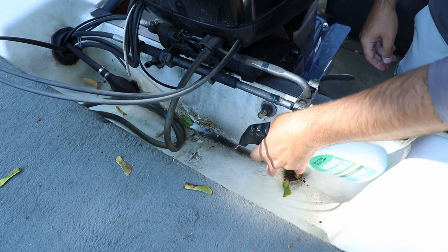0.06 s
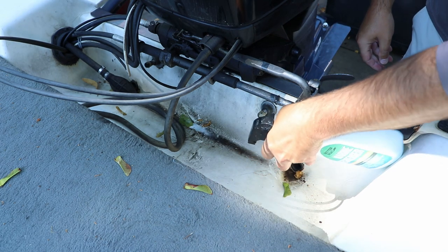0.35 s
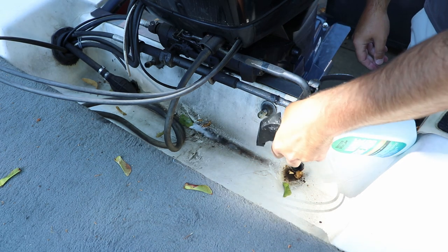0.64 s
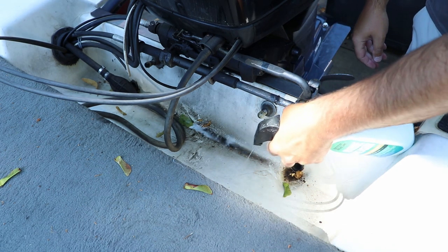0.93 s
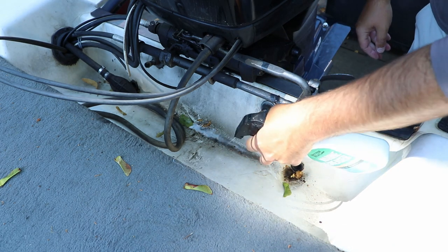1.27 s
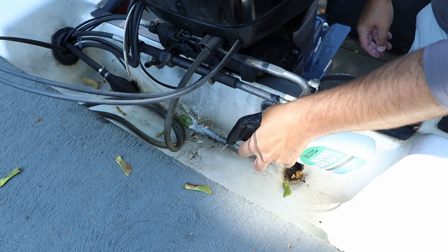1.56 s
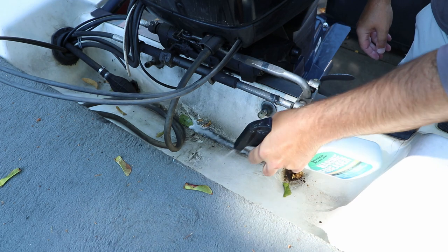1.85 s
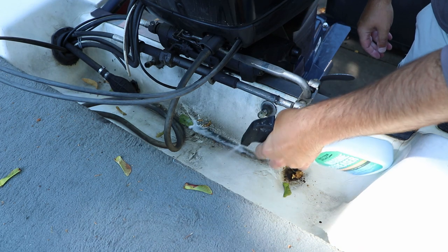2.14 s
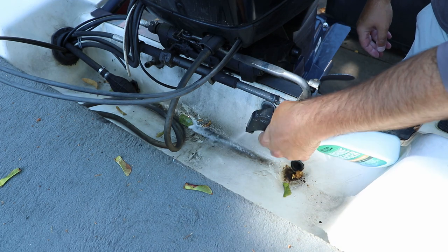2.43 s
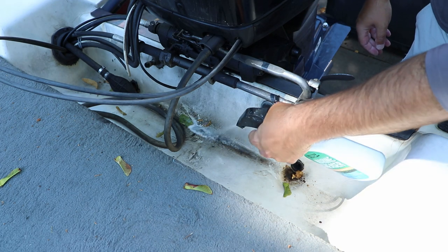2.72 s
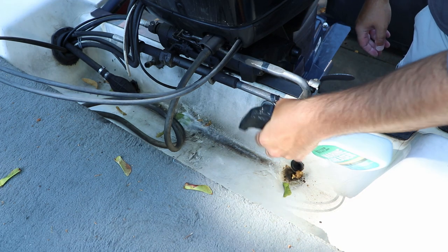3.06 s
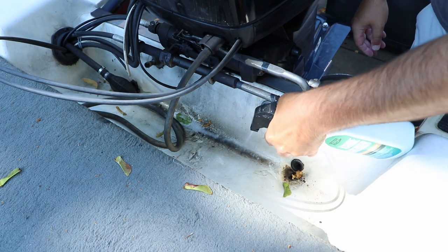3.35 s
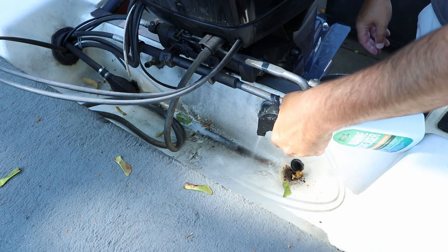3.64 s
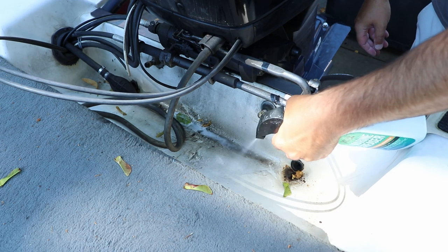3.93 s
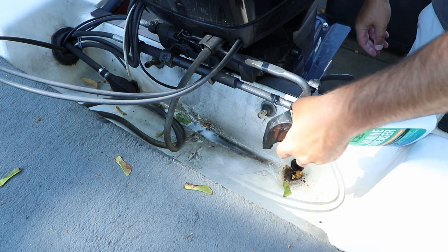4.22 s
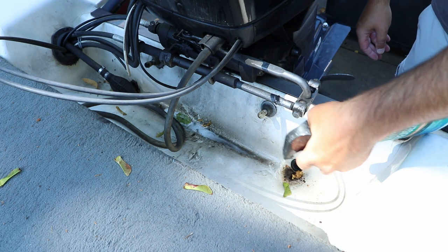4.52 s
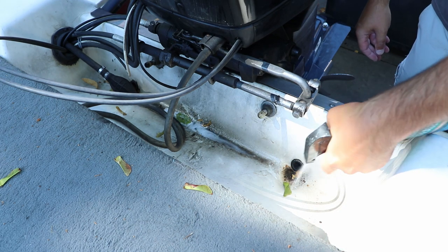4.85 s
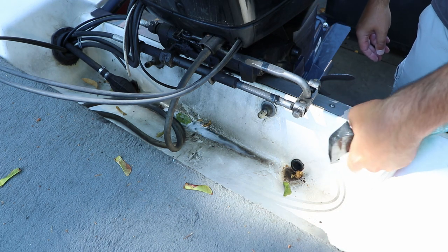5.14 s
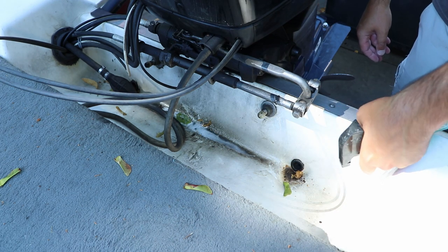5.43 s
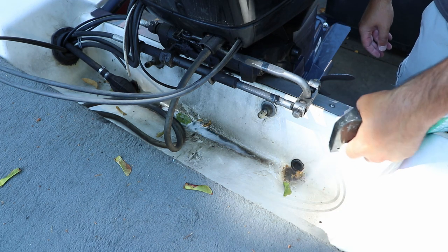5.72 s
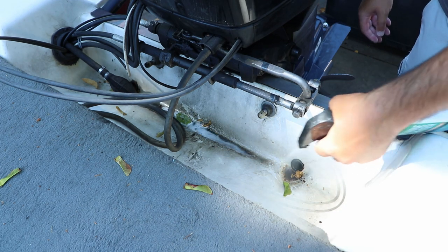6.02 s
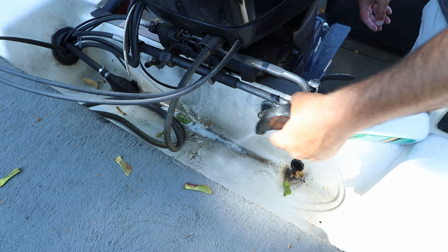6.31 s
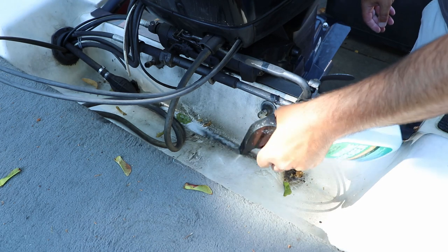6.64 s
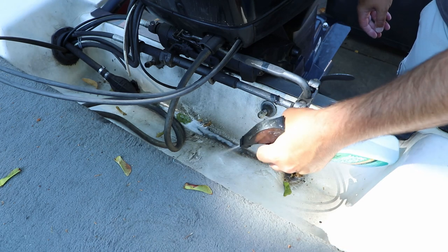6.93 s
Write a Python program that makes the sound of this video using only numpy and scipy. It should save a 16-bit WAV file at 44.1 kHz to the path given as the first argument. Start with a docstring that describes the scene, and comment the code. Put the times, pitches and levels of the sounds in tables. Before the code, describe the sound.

Outdoors, a trigger spray bottle is pumped about three times a second against a boat's hull. Each squeeze gives a short sputter and a wet hiss, followed by a plastic click and a small gulp. The spraying breaks off briefly after the middle, then resumes. Wind buffets the microphone with a low rumble, strongest early on. A few hollow knocks sound over a faint, distant rush of traffic and leaves.

```python
"""Wind buffets the microphone as a trigger spray bottle is pumped, about three times a second,
over a boat's engine well. Each squeeze spits through a fluttering valve, then opens into a hissing
mist that wets the hull; the plastic trigger clicks as it springs back and the pump gulps.
Something hollow knocks now and then, and a far rush of traffic and leaves lies underneath."""
import sys
import numpy as np
from scipy import signal
from scipy.fft import rfft, irfft, next_fast_len
from scipy.io import wavfile
from scipy.ndimage import uniform_filter1d, map_coordinates

SR = 44100
rng = np.random.default_rng(int(sys.argv[2]) if len(sys.argv) > 2 else 0)


def persist_wave(psi):
    """Save psi, clipped to +-1, as 16-bit WAV."""
    counts = np.round(np.clip(psi, -1, 1) * 32767).astype(np.int16)
    wavfile.write(sys.argv[1], SR, np.atleast_2d(counts).T)


N = 316440


def amp(db):
    """Decibels to gain."""
    return 10 ** (np.asarray(db) / 20)


def unit(x):
    """Scale to rms 1."""
    return x / np.sqrt(np.mean(x ** 2) + 1e-20)


def clock():
    """Sample times in seconds."""
    return np.arange(N) / SR


def wobble(rate_hz):
    """Smooth random curve, rate_hz knots a second."""
    step = max(int(SR / rate_hz / 6), 1)
    at = np.arange(0, N + step, step)
    knots = rng.standard_normal(int(N * rate_hz / SR) + 4)
    return np.interp(np.arange(N), at, map_coordinates(knots, [at * rate_hz / SR]))


def filtered(x, response):
    """Apply a gain given as a function of frequency."""
    size = next_fast_len(N + 8192)
    return irfft(rfft(x, size) * response(np.fft.rfftfreq(size, 1 / SR)), size)[:N]


def coloured(x, spectrum):
    """Shape x by (frequency [Hz], level [dB]) points; rms 1."""
    points_hz, db = np.transpose(spectrum)
    return unit(filtered(x, lambda hz: amp(np.interp(np.log(hz + 1), np.log(points_hz), db))))


def grains(depth_db, rate_hz):
    """White noise broken into tiny uneven grains."""
    return rng.standard_normal(N) * amp(depth_db * wobble(rate_hz))


def patchy(x, depth_db):
    """Slow random spectral peaks and dips, as the nozzle's aim shifts."""
    spectra = signal.stft(x, nperseg=512)[2]
    field = uniform_filter1d(rng.standard_normal(spectra.shape), size=5, axis=0)
    field = uniform_filter1d(field, size=14, axis=1)
    return signal.istft(spectra * amp(depth_db * unit(field)), nperseg=512)[1][:N]


def bursts(times_s, levels_db, rise_s, t60_s, slowness=1):
    """Envelope of short bursts, each randomly stretched in time."""
    out, t = np.zeros(N + SR), np.arange(SR // 10) / SR
    stretches = slowness * np.exp(rng.normal(0, 0.15, len(times_s)))
    for at_s, db, stretch in zip(times_s, levels_db, stretches):
        attack = 1 - np.exp(-(t / (rise_s * stretch)) ** 2)
        shape = attack * amp(-60 * t / (t60_s * stretch))
        start = max(round((at_s - rise_s * (stretch - 1)) * SR), 0)
        out[start:][:len(t)] += amp(db) * shape / shape.max()
    return out[:N]


def swell(crest_s, length_s, fullness, rise_share=0.43):
    """Rise and fall: 1 at the crest, 0.1 at both ends of the length."""
    t = clock() - crest_s
    distance = np.abs(t) / (length_s * np.where(t < 0, rise_share, 1 - rise_share))
    out, near = np.zeros(N), distance < 2
    out[near] = 10 ** -(distance[near] ** fullness)
    return out


# Background spectrum (frequency [Hz], level [dB])
OUTDOOR_SPECTRUM = [(60, -12), (200, -13), (350, -12), (520, -9), (750, -8), (980, -4.5), (1180, -7.5),
                    (1600, -17.5), (2700, -15.5), (4200, -21), (6000, -28.5), (8000, -34), (15800, -41)]


def outdoors():
    """Far, even rush of traffic and leaves."""
    level_db = -46 + 0.097 * wobble(2.72) + 1.5 * wobble(14)
    return amp(level_db) * coloured(rng.standard_normal(N), OUTDOOR_SPECTRUM)


def eddies(spectrum, evenness):
    """Low turbulence; evenness (0 to 1) flattens slow swells, leaving the quick lumps."""
    noise = coloured(rng.standard_normal(N), spectrum)
    power = np.abs(uniform_filter1d(noise ** 2, size=SR // 12)) + 1e-6
    return unit(noise / power ** (evenness / 2))


# Breeze strength (time [s], level [dB])
BREEZE_CURVE = [(0, -30.5), (.25, -23), (1.3, -23.5), (1.72, -18.5), (2.0, -26), (2.6, -26.5),
                (2.85, -24.5), (3.15, -27.5), (3.3, -33), (3.72, -38.5), (3.9, -43), (4.88, -49),
                (5.08, -27.5), (5.3, -23.5), (5.62, -31.5), (5.75, -41.5), (6.5, -50.5), (7.18, -47)]
# Gusts (crest [s], length [s], rumble [dB], flutter [dB])
WIND_GUSTS = [(0.045, 0.18, -20, -19), (0.412, 0.1, -25, -13), (0.488, 0.064, -11, -22.5),
              (0.765, 0.14, -19, -22.5), (1.11, 0.18, -22.5, -25.5), (1.57, 0.082, -20.5, -29),
              (1.803, .22, -20, -10.5), (2.204, 0.068, -21, -25.5), (2.374, 0.11, -21, -25),
              (3.496, .16, -29.5, -39), (4.983, 0.051, -36, -40), (5.142, 0.05, -27, -35),
              (5.333, 0.08, -25, -26), (5.393, 0.13, -17.5, -54), (6.1, 0.44, -39, -46),
              (6.692, 0.17, -27.5, -37), (6.816, 0.1, -33, -48), (7.092, 0.13, -35, -36)]
# Turbulence spectra (frequency [Hz], level [dB])
RUMBLE_SPECTRUM = [(6, -39), (25, -7), (45, 3), (85, 4), (115, -3), (170, -29), (300, -57), (900, -130)]
FLUTTER_SPECTRUM = [(60, -31), (100, 0.5), (130, 3.5), (190, -7.5), (280, -20.5), (400, -37.5), (600, -59),
                    (1500, -71), (4000, -130)]
TEARING_SPECTRUM = [(100, -26), (220, 4.5), (310, -3.5), (440, -12.5), (700, -34), (1500, -57),
                    (5000, -120)]
DRAUGHT_SPECTRUM = [(8, -26), (25, 1), (45, 4), (70, -26), (130, -28), (400, -56), (1500, -120)]


def wind():
    """Gusts buffet the microphone over a steady draught; the strongest tear into higher eddies."""
    moderate_breeze_db, strong_flutter_db = -24, -12
    breeze_db = np.interp(clock(), *np.transpose(BREEZE_CURVE))
    rumble = amp(breeze_db + 1.3 * wobble(14))
    flutter = amp(-29 + 1.61 * (breeze_db - moderate_breeze_db) + 2.3 * wobble(20))
    for crest_s, length_s, rumble_db, flutter_db in WIND_GUSTS:
        gust = swell(crest_s, length_s, fullness=1.75)
        rumble += amp(rumble_db) * gust
        flutter += amp(flutter_db) * gust
    tearing = amp(-24.5 + 3.5 * wobble(45)) * (flutter / amp(strong_flutter_db)) ** 1.3
    return (rumble * eddies(RUMBLE_SPECTRUM, evenness=1.0)
            + flutter * eddies(FLUTTER_SPECTRUM, evenness=0.5)
            + tearing * eddies(TEARING_SPECTRUM, evenness=0.53)
            + amp(-43) * eddies(DRAUGHT_SPECTRUM, evenness=0.14))


# Soft contacts (time [s], level [dB], pitch [Hz])
DULL_BUMPS = [(0.732, -17, 340), (0.736, -28, 620), (0.931, -28.5, 730)]


def bumps():
    """Soft contacts give a few dull cycles."""
    out, jitter_rad = np.zeros(N), 1.9 * wobble(220)
    for at_s, db, hz in DULL_BUMPS:
        tone = np.sin(2 * np.pi * hz * clock() + jitter_rad)
        out += bursts([at_s], [db], rise_s=0.003, t60_s=0.033) * tone
    return out


# Knocks on the hollow body (time [s], level [dB])
HOLLOW_KNOCKS = [(1.995, -21.5), (2.156, -26.5), (3.198, -20.5), (6.923, -23.5), (7.167, -23.5)]
# Its modes (frequency [Hz], level [dB], t60 [s])
HOLLOW_MODES = [(332, 1, 0.02), (393, 2, 0.12), (823, -2, 0.04), (898, -4, 0.06), (980, -0.5, 0.056),
                (1294, -6.5, 0.036), (1860, -10, 0.019)]
# Contacts within one knock (delay [s], level [dB])
KNOCK_CONTACTS = [(0, 0), (.003, -9.5), (0.03, -15.5)]


def knocks():
    """A hollow body is knocked, rebounds lightly and rings in slightly smeared modes."""
    out, t = np.zeros(N + SR), np.arange(SR // 4) / SR
    hz, mode_db, t60_s = np.transpose(HOLLOW_MODES)[:, :, None]
    attack = 1 - np.exp(-t / 0.0012)
    for at_s, db in HOLLOW_KNOCKS:
        for delay_s, contact_db in KNOCK_CONTACTS:
            walk = np.cumsum(rng.normal(0, 0.0091, (len(hz), len(t))), axis=1)
            smear_cycles = walk * np.sqrt(hz / hz.max())
            decay = amp(mode_db + rng.normal(0, 1, hz.shape) - 60 * t / t60_s)
            modes = decay * np.sin(2 * np.pi * (hz * t + smear_cycles + rng.random(hz.shape)))
            out[round((at_s + delay_s) * SR):][:len(t)] += amp(db + contact_db) * modes.sum(0) * attack
    return out[:N]


# Knock thud spectrum (frequency [Hz], level [dB])
THUD_SPECTRUM = [(60, -17), (160, 3), (260, 4), (500, -15), (1100, -12), (1600, -20), (4000, -23),
                 (9000, -60)]


def thuds():
    """Dull, rough thud under the modes of each knock."""
    times_s, levels_db = np.transpose(HOLLOW_KNOCKS)
    envelope = amp(-9) * bursts(times_s, levels_db, rise_s=0.0019, t60_s=0.14)
    return envelope * coloured(grains(depth_db=3, rate_hz=350), THUD_SPECTRUM)


def tick(at_s=5.4995, level_db=-28, pitch_hz=14800):
    """One thin, very high tick."""
    tone = np.sin(2 * np.pi * pitch_hz * clock() + 1.3 * wobble(2200))
    return bursts([at_s], [level_db], rise_s=0.00055, t60_s=0.0062) * tone


# Air drawn in with the liquid (crest [s], length [s], level [dB])
PUMP_GARGLES = [(1.18, 0.15, -42.5), (2.28, 0.28, -41), (4.95, 0.053, -38), (5.25, 0.18, -36.5),
                (6.088, 0.21, -45)]
# Bubble spectrum (frequency [Hz], level [dB])
GARGLE_SPECTRUM = [(150, -17), (400, -13), (620, 6), (830, -9), (1030, 7.5), (1400, -4.5), (3000, -4.5),
                   (10000, -65)]


def gargle():
    """Air bubbles churn through the pump chamber."""
    churn = sum(amp(db) * swell(crest_s, length_s, fullness=1.5)
                for crest_s, length_s, db in PUMP_GARGLES)
    return churn * coloured(grains(depth_db=2, rate_hz=300), GARGLE_SPECTRUM)


# Trigger releases (first gulp [s], gulps [count], gulp [dB], click [dB])
TRIGGER_RELEASES = [(.129, 2, -40.5, -48.5), (0.482, 2, -40.5, -49), (0.787, 2, -42.5, -48),
                    (1.075, 2, -40.5, -46.5), (1.348, 2, -39.5, -45.5), (1.608, 2, -39, -45.5),
                    (1.893, 2, -41.5, -45), (2.169, 2, -38, -46), (2.443, 2, -40.5, -53.5),
                    (2.721, 2, -41, -46.5), (2.979, 1, -39.5, -46), (3.531, 1, -43, -45),
                    (3.856, 1, -40, -47.5), (4.19, 1, -43, -46.5), (4.913, 2, -41.5, -50.5),
                    (5.181, 2, -37.5, -50.5), (5.395, 1, -41.5, -49.5), (5.694, 1, -41.5, -47),
                    (6.265, 1, -39.5, -48), (6.55, 1, -42.5, -49), (6.854, 1, -42, -43.5),
                    (7.157, 1, -45, -46)]
# Lever snap and housing spectra (frequency [Hz], level [dB])
SNAP_SPECTRUM = [(2000, -2.5), (4500, 4.5), (6400, 2.5), (7200, 0), (8000, -1), (11000, -8.5), (15800, -22)]
HOUSING_SPECTRUM = [(400, -22), (900, -8.5), (1500, -7), (2000, 0.5), (2500, 4.5), (3100, -1), (4200, -7),
                    (6500, -40), (12000, -43)]


def trigger(click_lead_s=0.0463, stop_lead_s=0.011, stop_hz=2640):
    """Ahead of the gulp, the freed lever snaps against its plastic housing, then taps its stop."""
    gulp_s, _, _, click_db = np.transpose(TRIGGER_RELEASES)
    click_s = gulp_s - click_lead_s
    snap = bursts(click_s, click_db, rise_s=0.0017, t60_s=0.1)
    snap *= coloured(grains(depth_db=1, rate_hz=710), SNAP_SPECTRUM)
    housing = bursts(click_s, click_db + 3.5, rise_s=0.0028, t60_s=0.097)
    housing *= coloured(patchy(grains(depth_db=2, rate_hz=700), depth_db=4.5), HOUSING_SPECTRUM)
    stop = bursts(gulp_s - stop_lead_s, click_db + 3.5, rise_s=0.0016, t60_s=0.072)
    stop *= unit(wobble(900) * np.sin(2 * np.pi * stop_hz * clock()))
    return snap + housing + stop


def gulps(gap_s=0.017, second_boost_db=7, body_offset_db=-2, first_slowness=1.27):
    """Rows for spits(): each release draws a slow gulp, often followed by a sharper one."""
    return [(at_s + k * gap_s, db + k * second_boost_db, db + body_offset_db, 1 if k else first_slowness)
            for at_s, count, db, _ in TRIGGER_RELEASES for k in range(round(count))]


# Valve flutter as a squeeze begins or ends (time [s], spits [count], gap [s], fizz [dB], body [dB])
VALVE_SPUTTERS = [(0.024, 1, .018, -37, -28.5), (.533, 4, .0208, -35.5, -35.5), (.826, 3, .02, -36, -36.5),
                  (1.113, 4, .0158, -35, -33.5), (1.388, 3, .0183, -36, -31), (1.669, 4, .012, -39, -36.5),
                  (1.923, 2, .012, -40, -33), (2.203, 6, .0178, -33.5, -30.5), (2.316, 1, .015, -39, -31.5),
                  (2.472, 2, .01, -37.5, -34), (2.759, 3, .012, -35.5, -33.5), (3.0, 2, 0.021, -39, -38),
                  (3.071, 1, .015, -31, -28), (3.291, 3, .015, -38, -37.5), (3.604, 2, .007, -40.5, -39),
                  (3.916, 2, .007, -43, -45), (4.548, 1, .015, -45, -39), (4.94, 1, .015, -44, -38),
                  (5.213, 6, .0148, -37, -41), (5.46, 2, .01, -39.5, -39.5), (5.724, 2, .011, -40, -38),
                  (5.852, 2, .012, -35.5, -56), (6.022, 4, .0115, -35.5, -37),
                  (6.294, 2, 0.0088, -37.5, -34), (6.621, 2, .006, -40, -36.5)]


def sputters(first_body_db=-2):
    """Rows for spits(): the valve flutters in even trains; the first spit carries less liquid."""
    return [(at_s + k * gap_s, fizz_db, body_db + (0 if k else first_body_db), 1)
            for at_s, count, gap_s, fizz_db, body_db in VALVE_SPUTTERS for k in range(round(count))]


# Spit spectra (frequency [Hz], level [dB])
FIZZ_SPECTRUM = [(2000, -9), (4500, 0.5), (6400, -0.5), (7200, -1.5), (8000, 3), (9300, -0.5), (10700, 0),
                 (13000, -2), (15800, -10)]
BODY_SPECTRUM = [(300, -4.5), (800, -0.5), (1500, -6.5), (2000, 1), (2500, 3), (3600, -1.5), (4600, -9.5),
                 (7000, -31), (12000, -34)]


def spits(scatter_db=0.9):
    """The pump gulps; at low pressure the nozzle valve opens and shuts, spitting air and liquid."""
    times_s, fizz_db, body_db, slowness = np.transpose(gulps() + sputters())
    fizz_scatter_db, body_scatter_db = scatter_db * rng.standard_normal((len(times_s), 2)).T
    fizz = bursts(times_s, fizz_db + fizz_scatter_db, rise_s=0.0027, t60_s=0.027, slowness=slowness)
    fizz *= coloured(patchy(grains(depth_db=3, rate_hz=1600), depth_db=2), FIZZ_SPECTRUM)
    body = bursts(times_s, body_db + body_scatter_db, rise_s=0.0024, t60_s=0.043, slowness=slowness)
    body *= coloured(patchy(grains(depth_db=3, rate_hz=1000), depth_db=1), BODY_SPECTRUM)
    return fizz + body


# Jet of each squeeze (crest [s], length [s], mist [dB], splash [dB], ring [Hz], ring [dB])
SPRAY_JETS = [(0.315, 0.2, -52, -44, 4620, -62), (0.617, 0.25, -53, -45.5, 5270, -57),
              (0.896, 0.16, -49, -41.5, 5000, -57), (1.175, 0.14, -46.5, -42, 4700, -53),
              (1.455, 0.14, -47, -41, 5100, -51), (1.742, .21, -51, -44, 5360, -53),
              (1.973, .19, -48.5, -41.5, 4870, -51), (2.255, 0.16, -47.5, -40, 4000, -45),
              (2.545, 0.13, -40.5, -41, 4670, -46), (2.836, .13, -37, -41, 4780, -45),
              (3.096, .1, -35, -34.5, 4910, -35), (3.39, 0.16, -50.5, -46, 4630, -54),
              (3.69, 0.21, -52, -48, 4900, -48), (4.003, 0.22, -51, -45, 4700, -52),
              (4.765, 0.14, -42, -45, 9350, -48), (4.979, .17, -44.5, -42.5, 2920, -48),
              (4.984, 0.063, -32, -60, 8100, -35.5), (5.244, .16, -49.5, -45, 3890, -41.5),
              (5.539, 0.15, -46, -47.5, 4840, -46), (5.813, .14, -43.5, -43, 9500, -49),
              (6.102, 0.12, -44.5, -43.5, 8400, -50), (6.383, 0.19, -50.5, -45, 4900, -54),
              (6.706, 0.14, -51.5, -44.5, 4700, -54), (6.98, 0.18, -53, -46, 4550, -55)]
# Nozzle mist and hull splash spectra (frequency [Hz], level [dB])
MIST_SPECTRUM = [(2000, -37), (4500, -31), (6500, -2), (7200, -5), (8000, -1), (9000, -1.5), (11000, 0.5),
                 (13500, -1.5), (15800, -8.5)]
SPLASH_SPECTRUM = [(250, -30), (700, -3.5), (1100, 0), (1500, -2), (2100, 3.5), (3500, -0.5), (4800, 0),
                   (5600, -3), (6500, -7.5), (12000, -30)]


def spray():
    """The jet hisses at the nozzle, its faint ring differing with each aim; droplets patter on the hull."""
    mist = coloured(patchy(grains(depth_db=4, rate_hz=2800), depth_db=2.8), MIST_SPECTRUM)
    splash = coloured(patchy(grains(depth_db=1.5, rate_hz=1200), depth_db=1), SPLASH_SPECTRUM)
    out, t, ring_noise = np.zeros(N), clock(), wobble(1200)
    for crest_s, length_s, mist_db, splash_db, ring_hz, ring_db in SPRAY_JETS:
        flow = swell(crest_s, length_s, fullness=2.44)
        on = np.flatnonzero(flow)
        ring = amp(ring_db) * ring_noise[on] * np.sin(2 * np.pi * ring_hz * t[on])
        out[on] += flow[on] * (amp(mist_db) * mist[on] + ring + amp(splash_db) * splash[on])
    return out * amp(1.1 * wobble(130))


def scene():
    """Bottle, knocks and air at one microphone."""
    bottle = spray() + spits() + gargle() + trigger() + tick()
    return (bottle + knocks() + thuds() + bumps() + wind() + outdoors())[None]


def record(dry):
    """Soft clipping rounds off the biggest gusts; a band limit cuts the top."""
    ceiling, top_hz = 0.85, 15900
    rounded = dry[0] / (1 + np.abs(dry[0] / ceiling) ** 6) ** (1 / 6)
    return filtered(rounded, lambda hz: hz < top_hz)[None]


dry = scene()
out = record(dry)
persist_wave(out)
```